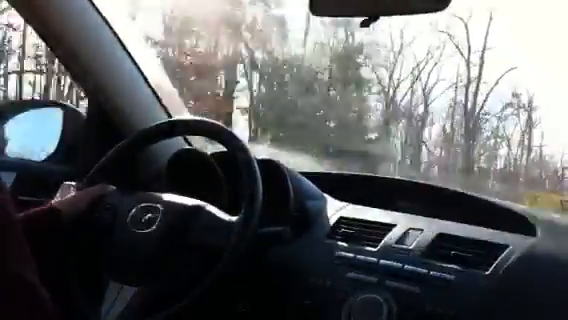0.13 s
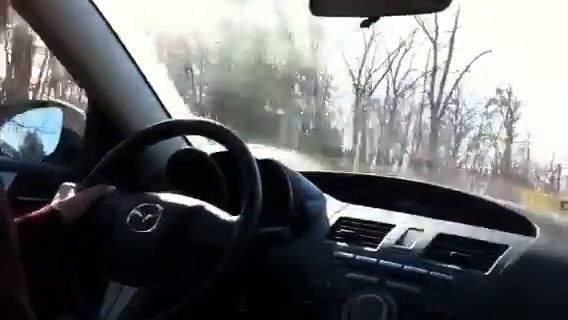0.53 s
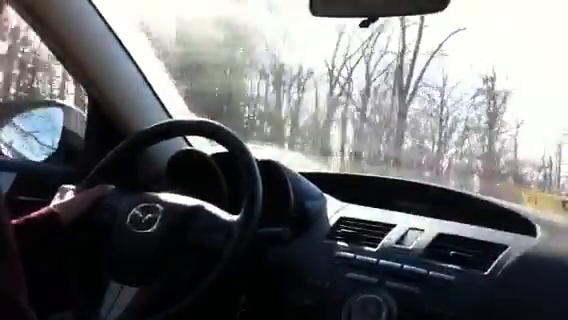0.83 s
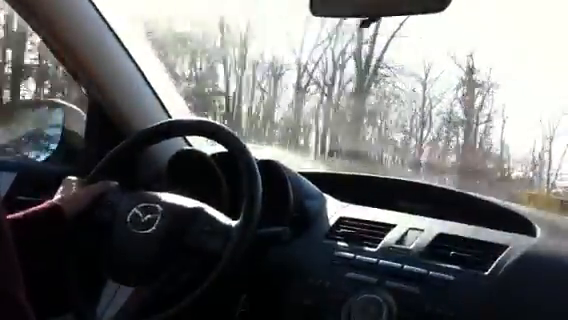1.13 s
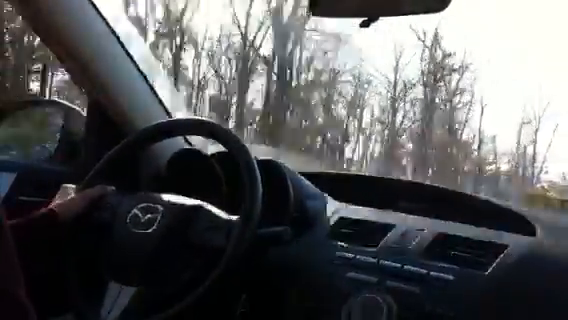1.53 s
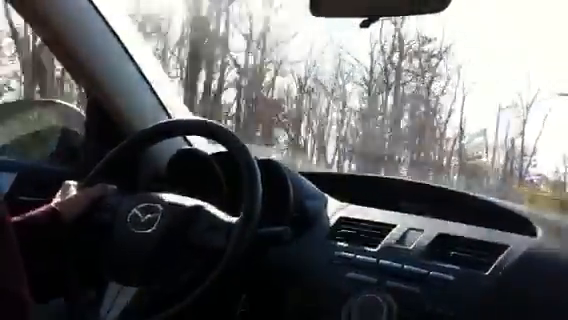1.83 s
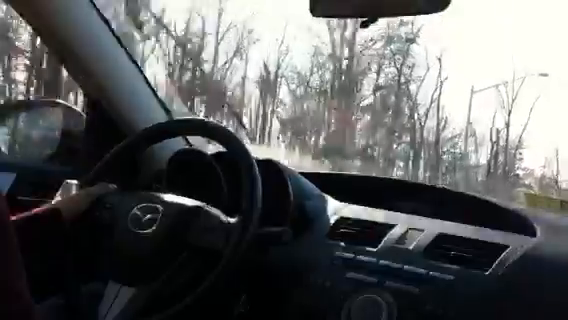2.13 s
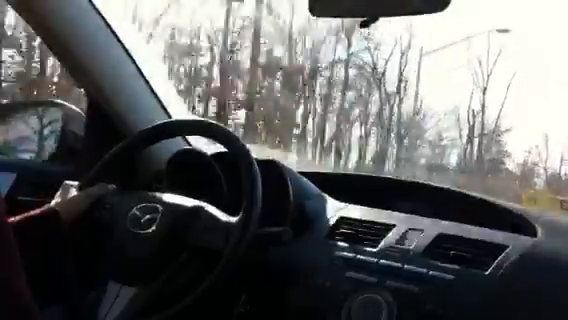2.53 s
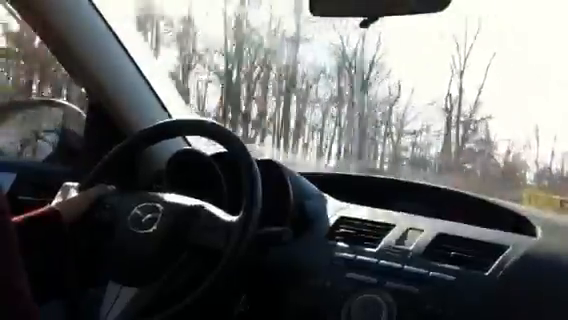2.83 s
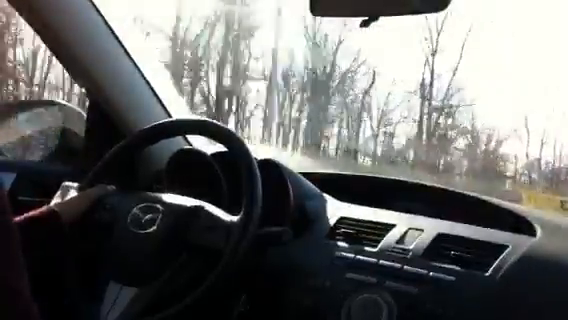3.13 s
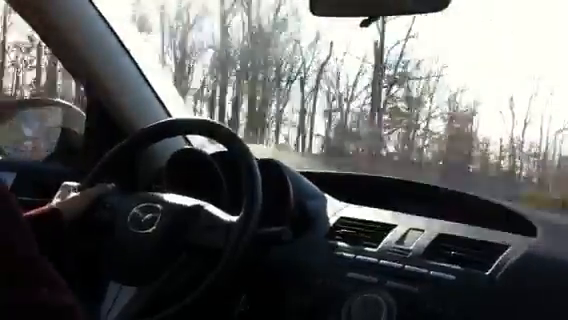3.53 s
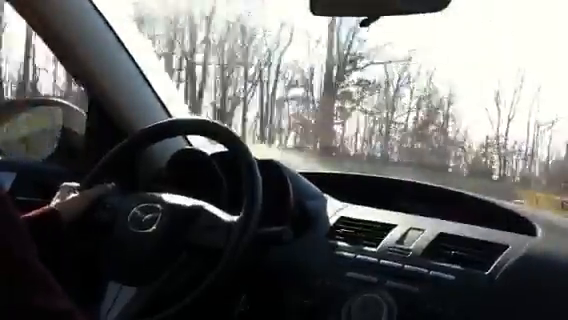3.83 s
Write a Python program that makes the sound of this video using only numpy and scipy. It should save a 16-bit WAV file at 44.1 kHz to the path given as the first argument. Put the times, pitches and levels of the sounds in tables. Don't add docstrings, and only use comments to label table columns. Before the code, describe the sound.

Turbo car engine pulls hard from inside the cabin, then a fluttering whoosh and a knock

```python
import sys
import numpy as np
from scipy import signal
from scipy.fft import rfft, irfft
from scipy.io import wavfile
from scipy.ndimage import uniform_filter1d

SR = 44100
rng = np.random.default_rng(int(sys.argv[2]) if len(sys.argv) > 2 else 0)


def store_pcm(level_fs):
    pcm = np.round(np.clip(level_fs, -1, 1) * 32767).astype(np.int16)
    wavfile.write(sys.argv[1], SR, np.atleast_2d(pcm).T)


def voltage_ratio(decibels):
    exponent = np.asarray(decibels, float) / 20
    return 10 ** exponent


N = 176400

# time in seconds, firing rate in Hz.
FIRING_RATE = [(0, 80.7), (.2, 75.5), (.47, 74.15), (.6, 70.46), (1.08, 73), (1.9, 78.45), (2.74, 86.76),
               (3.17, 90.9), (3.3, 92.8), (3.48, 86.7), (3.62, 85.3), (3.84, 78.9), (4, 73)]
# time in seconds, load on each firing (1 full pull, below 0 overrun).
ENGINE_LOAD = [(0, .15), (.3, .1), (.45, .1), (.49, .8), (.54, 1.1), (.585, 1), (.61, .88), (.635, 1.1),
               (.74, 1.05), (.79, .96), (.9, 1), (3.14, 1), (3.18, .8), (3.28, .75), (3.33, -.3),
               (3.39, -.8), (3.45, -.5), (3.7, -.4), (3.85, 0), (4, 0)]
# firing rate in Hz, then levels in dB of firing orders 1, 2, 3 and 4.
ORDER_BOOM = [(70, -38, -36.5, -33, -68), (73.4, -34, -30.5, -30, -75), (79.3, -31, -33.5, -35.5, -55),
              (80.1, -29.5, -42, -41, -47), (82.13, -27.5, -28.5, -35, -55), (85.1, -26, -28, -36, -49),
              (87.1, -26, -32.5, -37.5, -38.5), (90.4, -27, -32, -35, -51.5), (92.8, -26.5, -36, -34, -69)]
ORDER_COAST_DB = [-7, -13, -15, -6]
ORDER_LET_GO = [1, 4, 1.1, 1]
ORDER_WOBBLE_DB = [.4, 1.0, 1.2, 3]
# frequency in Hz, level in dB per Hz.
EXHAUST_COLOUR = [(35, -17), (60, -3), (91, -12.5), (128, -2.5), (176, -2.5), (429, -6.5), (497, -18),
                  (669, -14.5), (1500, -33), (1950, -53), (3300, -120)]
# time in seconds, level in dB.
EXHAUST_LEVEL = [(0, -50), (.45, -52), (.6, -52), (1.2, -36.5), (2, -39), (2.7, -31), (3.05, -32.5),
                 (3.2, -33), (3.35, -29), (3.5, -35.5), (3.7, -42), (4, -36.5)]
# time in seconds, level in dB.
AIR_FLOW = [(0, -52), (.3, -64), (.52, -68), (.98, -59), (1.44, -56.5), (1.8, -53), (2.2, -50.5),
            (2.67, -47.5), (3.1, -48), (3.2, -46.5), (3.26, -42.5), (3.33, -44.5), (3.39, -47.5),
            (3.6, -49), (3.8, -54.5), (4, -62)]
# frequency in Hz, level in dB per Hz.
INTAKE_COLOUR = [(300, -16), (600, -3.5), (1100, -15), (2300, -19.5), (3300, -20), (5500, -31), (9000, -37),
                 (15700, -46)]
DUCT_MODES_HZ = [4390, 4980, 6090, 6540, 7040, 7860, 9210, 9950, 13400]
PANEL_MODES_HZ = [690, 990, 1483, 1645, 2046, 2238, 2505, 2622, 2762, 2880, 3092, 1227, 1389, 1806]
# width in Hz, level in dB.
PANEL_RINGS = [(40.6, -2.5), (35, 6.5), (22, 9), (19.5, 8.5), (24, 7.5), (25, -6), (16, 0.5), (20, 9),
               (20, 7.5), (22, 9.5), (22, 5), (30, 1.5), (28, -4.5), (22, -3)]
# time in seconds, pitch in Hz, level in dB.
WHISTLE = [(1.3, 7000, -95), (1.7, 8500, -90), (1.88, 9200, -74), (2.0, 9650, -82), (2.1, 10000, -76),
           (2.18, 10350, -83), (2.27, 10650, -76), (2.4, 11250, -92), (2.54, 11700, -76),
           (2.72, 11750, -74), (2.8, 11800, -95)]
# start in seconds, length in seconds, level in dB, top pitch in Hz, end pitch in Hz.
FLUTTER_PUFFS = [
    (3.222, 0.056, -38, 3300, 1500),
    (3.285, 0.06, -39.5, 3160, 1500),
    (3.345, .05, -47, 1770, 1200),
]
# frequency in Hz, level in dB per Hz.
VENT_COLOUR = [(1000, -11), (2800, 2), (4500, -9.5), (9000, -17), (14000, -24), (15700, -34.5)]
# start in seconds, length in seconds, pitch in Hz, peak in dB rms.
PIPE_NOTES = [(3.22, .045, 3090, -45), (3.228, .045, 2760, -43), (3.235, .04, 2620, -46),
              (3.235, .035, 2450, -46), (3.232, .036, 2050, -44), (3.23, .045, 1800, -48),
              (3.235, .04, 1650, -43), (3.237, .045, 1490, -39), (3.215, .05, 705, -38),
              (3.285, .05, 2760, -44), (3.303, .04, 2870, -44), (3.3, .04, 2500, -44),
              (3.285, .03, 3060, -49), (3.298, .03, 1400, -40), (3.318, .035, 1480, -40),
              (3.305, .08, 1650, -45), (3.315, .05, 1810, -48), (3.31, .03, 4200, -54),
              (3.36, .04, 1050, -44)]
# time in seconds, level in dB.
KNOCK_TICKS = [(3.147, -36), (3.158, -33), (3.181, -32), (3.191, -32), (3.213, -33), (3.224, -35),
               (3.246, -34), (3.257, -33), (3.279, -32), (3.289, -32), (3.312, -35)]
TICK_PITCHES_HZ = [3650, 7000]
# time in seconds, level in dB, body pitch in Hz, cabin pitch in Hz, click in dB.
DRIVELINE_KNOCKS = [
    (.286, -23, 100, 205, -50),
    (3.546, -14, 145, 212, -23.5),
]
CLICK_PITCHES_HZ = [710, 1158]
# time in seconds, level in dB.
TRIM_CREAKS = [
    (.564, -45),
    (.823, -42.5),
]
CREAK_PITCHES_HZ = [1650, 3700]
# start in seconds, length in seconds, pitch in Hz, peak in dB rms.
ROAD_BUMPS = [(.06, 0.062, 194, -42), (.12, 0.064, 234, -38.5), (.14, 0.049, 179, -35),
              (.2, 0.075, 205, -36), (.34, 0.04, 215, -36.5), (.53, 0.077, 320, -42.5),
              (3.17, .1, 325, -32), (3.29, 0.068, 171.6, -30), (3.28, 0.041, 129.7, -38),
              (3.29, 0.044, 262, -38), (3.31, 0.051, 441.4, -34), (3.35, 0.099, 122.6, -34)]
# frequency in Hz, level in dB per Hz.
ROAD_COLOUR = [(50, -42), (100, -2.5), (220, -1), (450, -7), (1000, -18.5), (2200, -29), (4500, -50.5),
               (15700, -53)]
# pitch in Hz, width in Hz, level in dB.
AIR_CAVITIES = [(207.7, 23.5, 0), (316, 19, -6.5), (428, 33, -4)]
# frequency in Hz, level in dB per Hz.
MIC_HISS = [(1000, -10), (5000, 6), (12000, -10), (15700, -4.5)]


def column(table, k):
    times = [row[0] for row in table]
    return np.interp(np.arange(N) / SR, times, [row[k] for row in table])


def evened(x):
    return x / np.sqrt(np.mean(x ** 2) + 1e-20)


def slow_drift(top_hz):
    hz = np.fft.rfftfreq(N, 1 / SR)
    lowpass = (hz > 0) / (1 + (hz / top_hz) ** 4)
    return evened(irfft(rfft(rng.standard_normal(N)) * lowpass, N))


def noise(colour, patchy_db):
    hz = np.fft.rfftfreq(2048, 1 / SR)
    real, imag, patches = rng.standard_normal((N // 512 + 6, 1025, 3)).T
    patches = uniform_filter1d(patches, size=12, axis=0)
    patches = evened(uniform_filter1d(patches, size=6, axis=1))
    f, db = np.transpose(colour)
    colour_db = np.interp(np.log(hz + 1), np.log(f), db)[:, None]
    spectrum = (real + 1j * imag) * voltage_ratio(colour_db + patchy_db * patches)
    return evened(signal.istft(spectrum, nperseg=2048, noverlap=1536)[1][:N])


def resonate(x, hz, width_hz):
    turn = np.exp(2j * np.pi * np.cumsum(hz * np.ones(len(x))) / SR)
    r = np.exp(-np.pi * width_hz / SR)
    return 2 * (turn * signal.lfilter([1 - r], [1, -r], x / turn)).real


def panels(x, damping=1):
    out = 0
    for k, (hz, (width_hz, db)) in enumerate(zip(PANEL_MODES_HZ, PANEL_RINGS)):
        out = out + (-1) ** k * voltage_ratio(db) * resonate(x, hz, width_hz * damping)
    return out


def blown(notes):
    rough_db, rough_hz = 3.5, 170
    t, out, rough = np.arange(N) / SR, np.zeros(N), slow_drift(rough_hz)
    for (start, length, hz, db), turn in zip(notes, rng.random(len(notes))):
        shape = np.sin(np.pi * np.clip((t - start) / length, 0, 1))
        level_db = db + rough_db * min(hz / 1000, 1) * np.roll(rough, int(turn * N))
        out += np.sqrt(2) * voltage_ratio(level_db) * shape * np.sin(2 * np.pi * (hz * t + turn))
    return out


def engine():
    wobble_hz = 14
    clutch_s, clutch_width_s, clutch_db = 0.476, 0.073, -14
    hz, load = column(FIRING_RATE, 1), column(ENGINE_LOAD, 1)
    turns, boom = np.cumsum(hz) / SR, np.transpose(ORDER_BOOM)
    throb = 1 + 0.053 * np.cos(2 * np.pi * turns)
    out = voltage_ratio(column(EXHAUST_LEVEL, 1)) * noise(EXHAUST_COLOUR, patchy_db=1.0) * throb
    for k in range(4):
        db = np.interp(hz, boom[0], boom[k + 1])
        db += ORDER_COAST_DB[k] * np.minimum(ORDER_LET_GO[k] * (1 - load), 1.6)
        db += ORDER_WOBBLE_DB[k] * slow_drift(wobble_hz)
        if k == 0:
            db += clutch_db * np.exp(-((np.arange(N) / SR - clutch_s) / clutch_width_s) ** 2)
        out += np.sqrt(2) * voltage_ratio(db) * np.sin(2 * np.pi * (k + 1) * turns)
    return out, turns


def intake(turns):
    gate_depth, panel_db, duct_db, duct_width_hz = 0.11, 4.5, 5.5, 75
    flow = voltage_ratio(column(AIR_FLOW, 1) + 3.0 + .5 * slow_drift(21))
    gate = (1 + gate_depth * np.cos(2 * np.pi * turns)) * flow
    rush = gate * noise(INTAKE_COLOUR, patchy_db=1.93)
    ring = gate * noise(INTAKE_COLOUR, patchy_db=1.93)
    ducts = sum(resonate(ring, hz, duct_width_hz) for hz in DUCT_MODES_HZ)
    return rush + voltage_ratio(panel_db) * panels(ring) + voltage_ratio(duct_db) * ducts


def turbine():
    hz = column(WHISTLE, 1) + 40 * slow_drift(30)
    db = column(WHISTLE, 2) + 3.5 * slow_drift(25)
    return np.sqrt(2) * voltage_ratio(db) * np.sin(2 * np.pi * np.cumsum(hz) / SR)


def puff(white, spray, start, length, db, top_hz, end_hz):
    width_hz, panel_damping, spray_db = 1300, 2.5, -11
    t = np.arange(N) / SR
    u = np.clip((t - start) / length, 0, 1)
    hz, shape = top_hz * (end_hz / top_hz) ** u, np.sin(np.pi * u)
    swept = resonate(resonate(white, hz, width_hz), hz, width_hz) * shape
    fade = np.exp(-np.maximum(t - start - length, 0) / .008)
    rung = (panels(swept, panel_damping) + .3 * swept) * fade
    rung_rms = np.sqrt(np.sum(rung ** 2) / (length * SR / 2))
    return voltage_ratio(db) * (rung / rung_rms + voltage_ratio(spray_db) * spray * shape)


def vent(spray):
    start_s, rise_s, hold_s, fall_s = 3.408, .028, .14, .025
    vent_db, sag_db_per_s = -42.5, -61
    t = np.arange(N) / SR
    end_s = start_s + rise_s + hold_s
    shape = np.clip((t - start_s) / rise_s, 0, 1) * np.exp(-np.maximum(t - end_s, 0) / fall_s)
    level = voltage_ratio(vent_db + sag_db_per_s * np.maximum(t - start_s, 0))
    return level * shape * (noise(VENT_COLOUR, patchy_db=1.0) + 0.76 * panels(spray))


def flutter():
    spray_colour = [(300, -10), (1500, 0), (3000, -2), (4500, -9), (9000, -17), (15700, -24)]  # Hz, dB per Hz
    spray = noise(spray_colour, patchy_db=2)
    white = rng.standard_normal(N)
    puffs = sum(puff(white, spray, *row) for row in FLUTTER_PUFFS)
    return puffs + vent(spray) + blown(PIPE_NOTES)


def knock_ticks():
    t, out = np.arange(6000) / SR, np.zeros(N)
    tones = sum(share * np.sin(2 * np.pi * hz * t) for hz, share in zip(TICK_PITCHES_HZ, [1, .3]))
    tick = tones * np.exp(-1800 * t)
    for s, db in KNOCK_TICKS:
        out[round(s * SR):][:6000] += voltage_ratio(db) * tick
    return out


def driveline_knocks():
    t, out = np.arange(6000) / SR, np.zeros(N)
    thud_t60_s, click_t60_s = .13, .04
    late = np.maximum(t - .006, 0)
    click = sum(g * np.sin(2 * np.pi * hz * late) for hz, g in zip(CLICK_PITCHES_HZ, [1, .5]))
    click = click * np.minimum(late / 0.0012, 1)
    for s, db, body_hz, cabin_hz, click_db in DRIVELINE_KNOCKS:
        cabin = np.sin(2 * np.pi * cabin_hz * t) * np.minimum(t / .02, 1.8)
        ring = np.sin(2 * np.pi * body_hz * t) + cabin
        thud = np.minimum(t / .014, 1) * voltage_ratio(db - 60 * t / thud_t60_s) * ring
        out[round(s * SR):][:6000] += thud + click * voltage_ratio(click_db - 60 * late / click_t60_s)
    return out


def trim_creaks():
    t, out, creak_s = np.arange(6000) / SR, np.zeros(N), .0045
    shape = t / creak_s * np.exp(-(t / creak_s) ** 2)
    for (s, db), grit in zip(TRIM_CREAKS, rng.standard_normal((len(TRIM_CREAKS), 6000))):
        creak = .03 * grit
        for hz, share in zip(CREAK_PITCHES_HZ, [1.8, .5]):
            creak = creak + share * np.sin(2 * np.pi * hz * t) + resonate(grit, hz, 1100)
        out[round(s * SR):][:6000] += voltage_ratio(db) * creak * shape
    return out


def road():
    roar = voltage_ratio(-38 + 0.28 * slow_drift(7.9)) * noise(ROAD_COLOUR, patchy_db=1.5)
    rung = sum(voltage_ratio(db) * resonate(roar, hz, width_hz) for hz, width_hz, db in AIR_CAVITIES)
    return roar + rung + blown(ROAD_BUMPS)


def scene():
    motor, turns = engine()
    boost = intake(turns) + turbine() + flutter()
    hits = knock_ticks() + driveline_knocks() + trim_creaks()
    return (motor + boost + hits + road())[None]


def top_cut(x):
    return signal.sosfilt(signal.butter(12, 15790, fs=SR, output="sos"), x)


def record(dry):
    heard = dry + voltage_ratio(-76.5) * noise(MIC_HISS, patchy_db=7.0)
    bass_cut = signal.butter(4, 81.3, "high", fs=SR, output="sos")
    return top_cut(signal.sosfilt(bass_cut, heard))


dry = scene()
out = record(dry)
store_pcm(out)
```